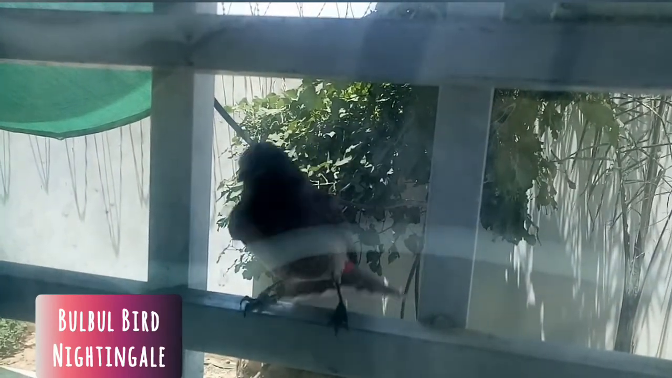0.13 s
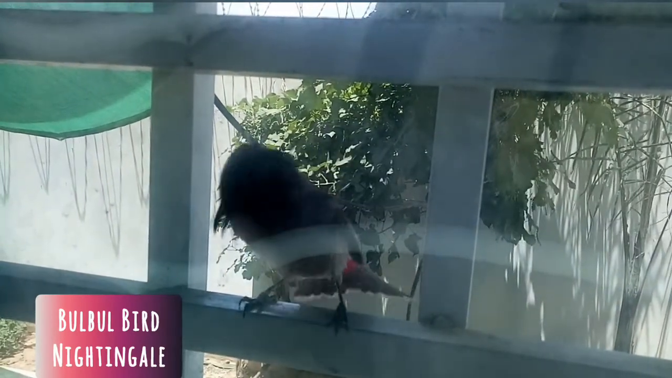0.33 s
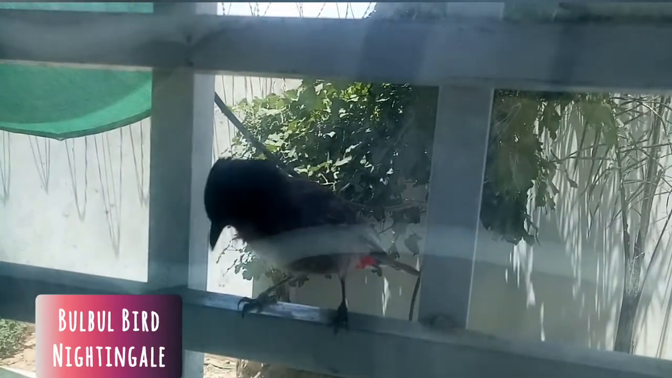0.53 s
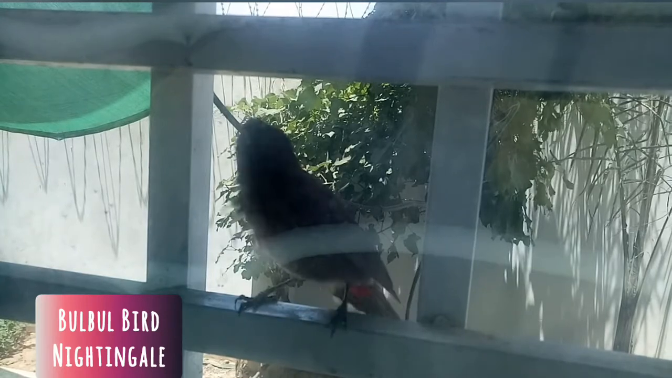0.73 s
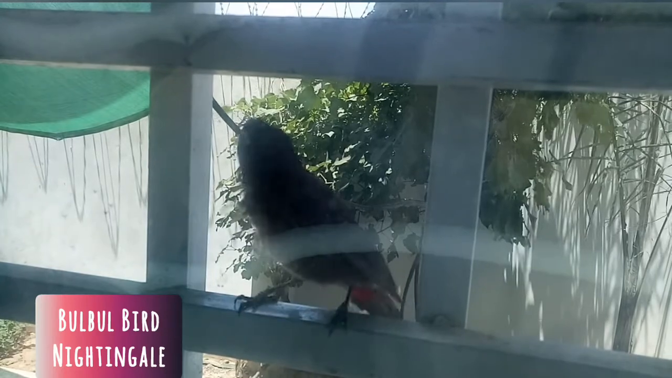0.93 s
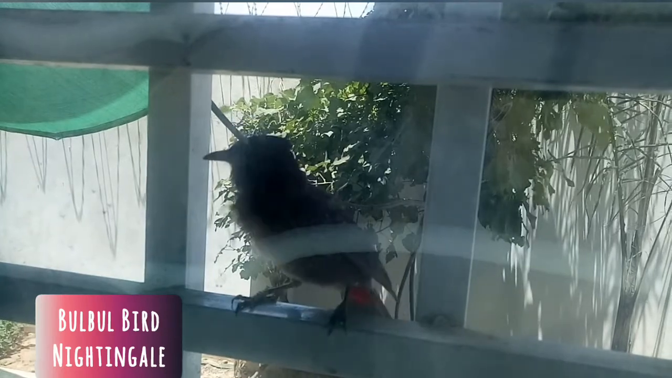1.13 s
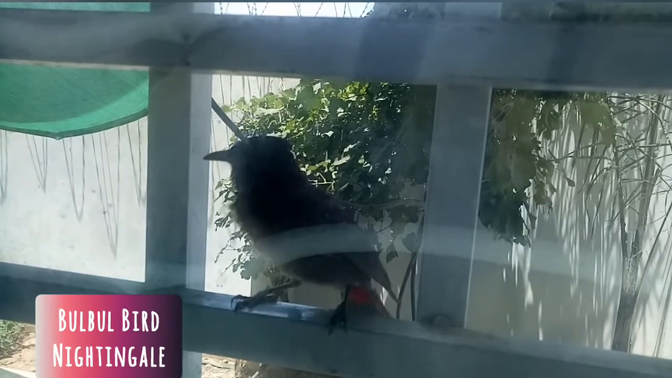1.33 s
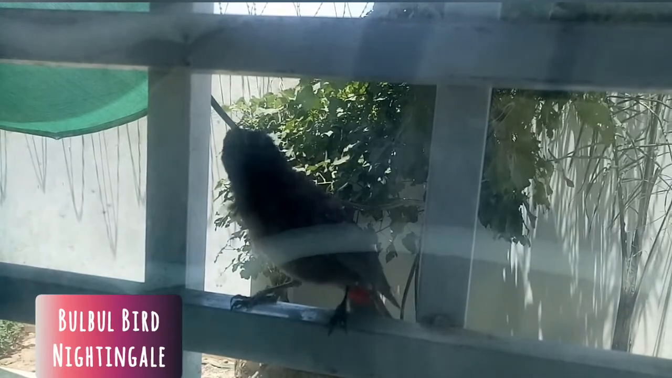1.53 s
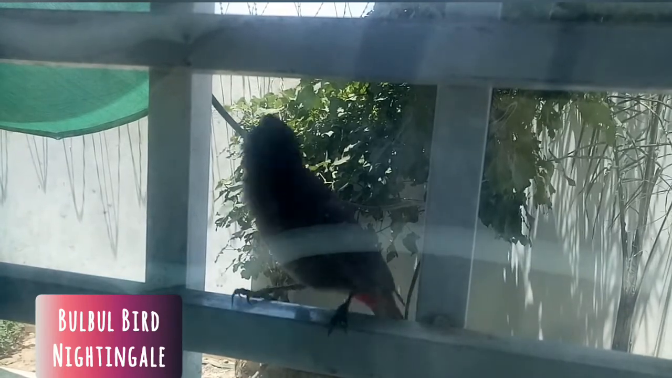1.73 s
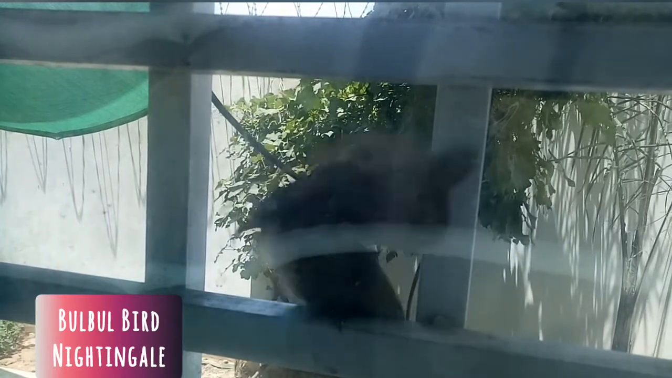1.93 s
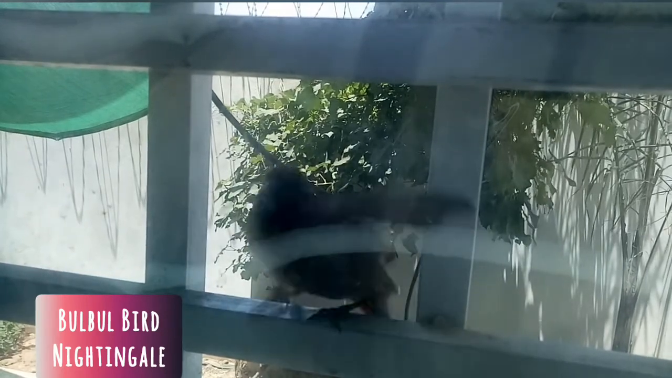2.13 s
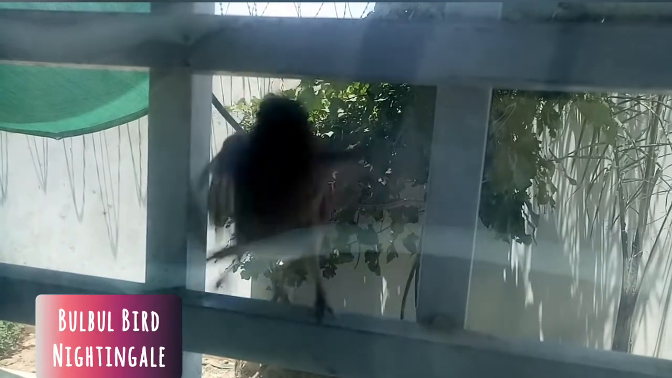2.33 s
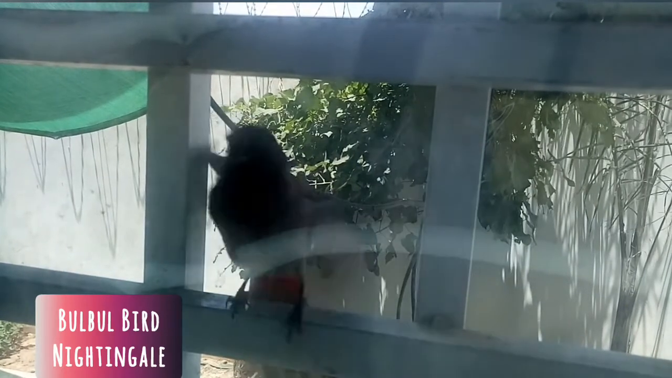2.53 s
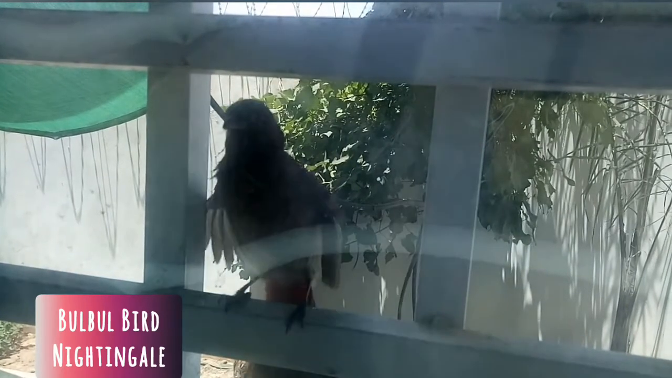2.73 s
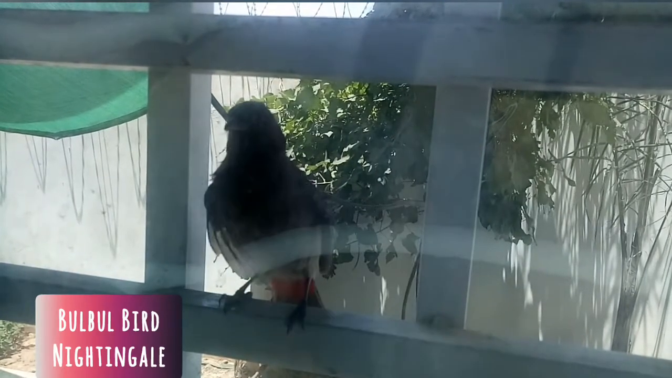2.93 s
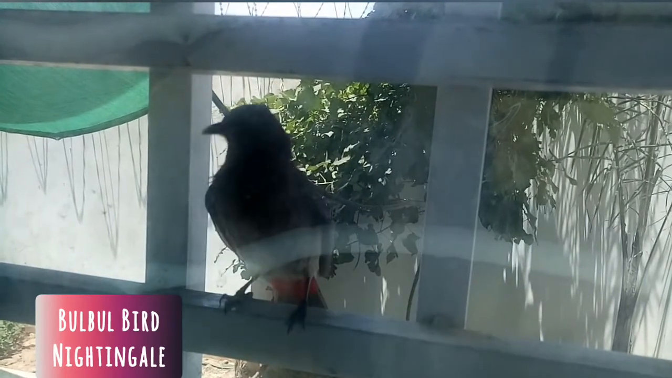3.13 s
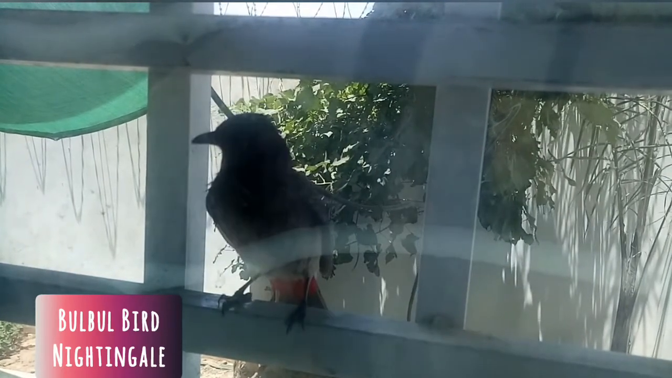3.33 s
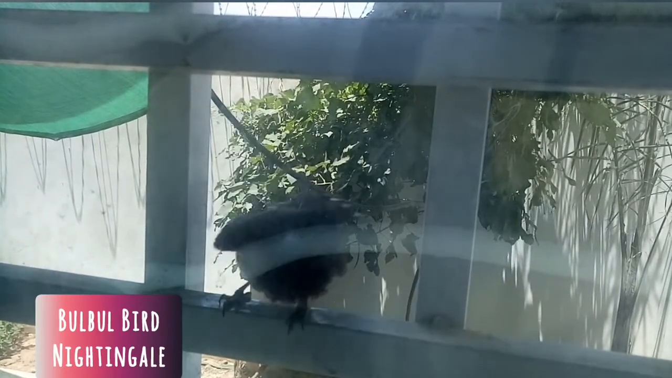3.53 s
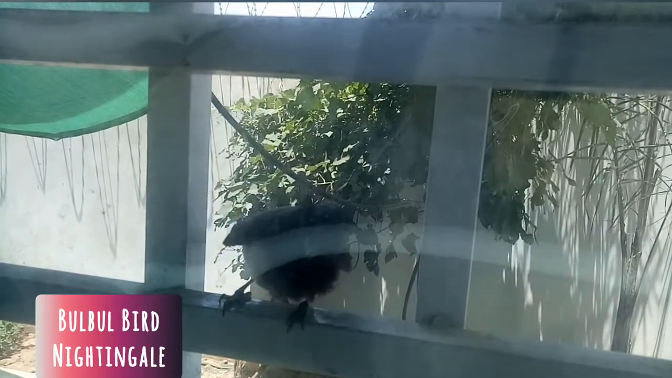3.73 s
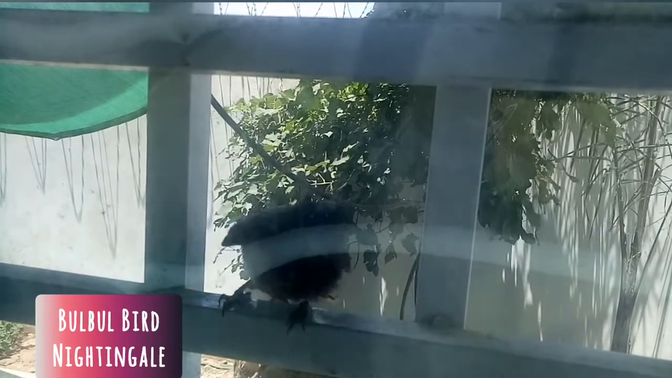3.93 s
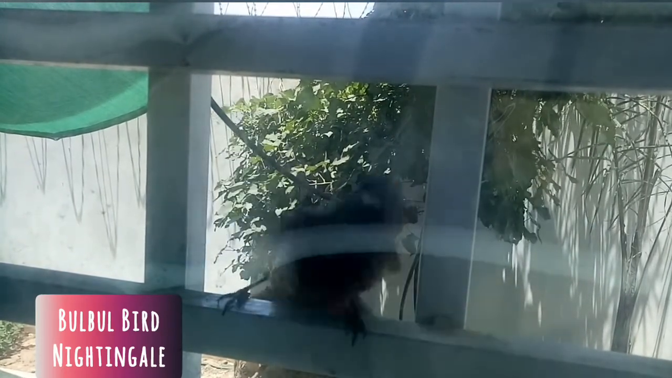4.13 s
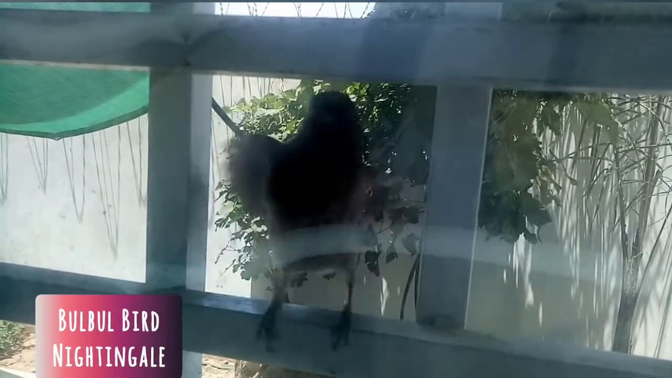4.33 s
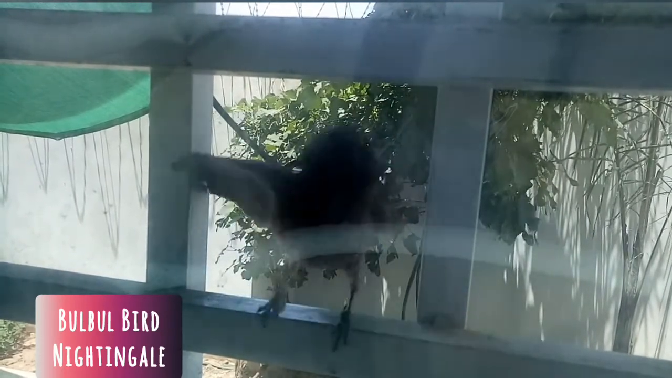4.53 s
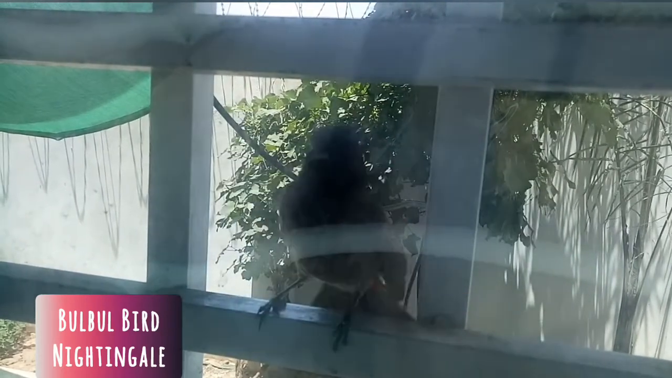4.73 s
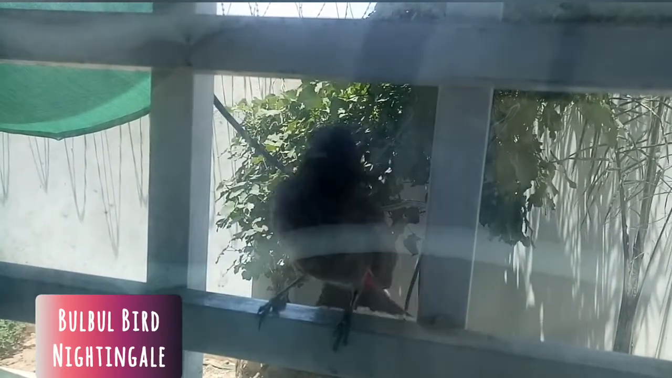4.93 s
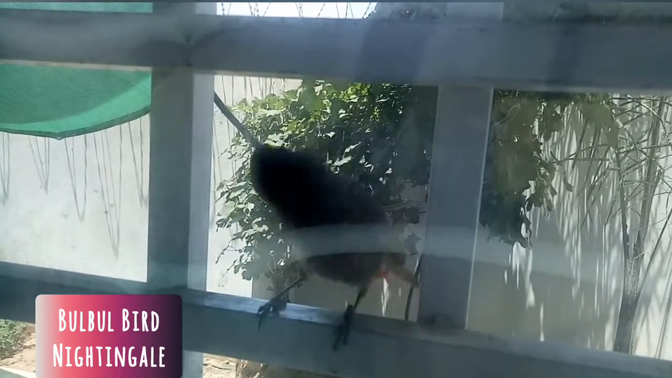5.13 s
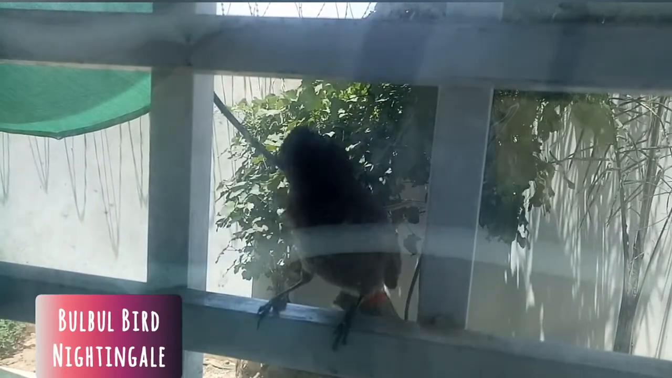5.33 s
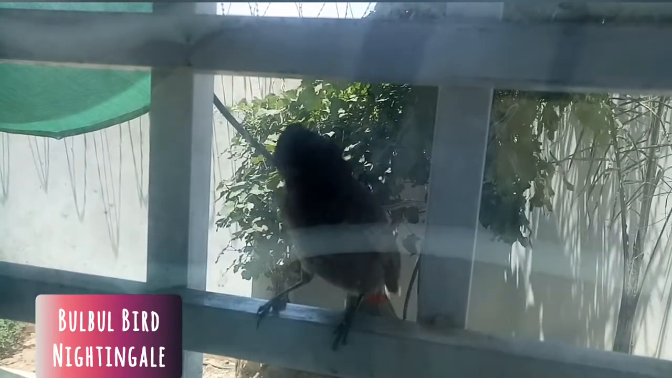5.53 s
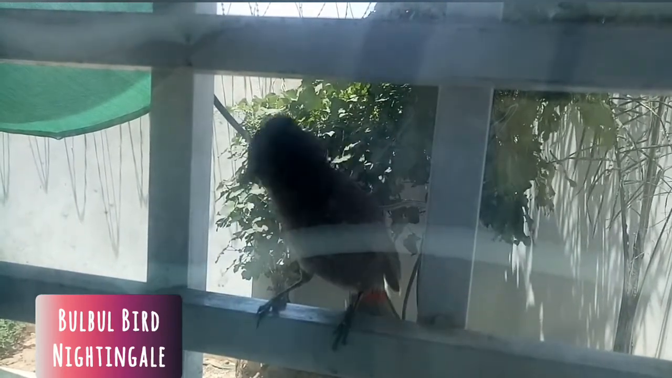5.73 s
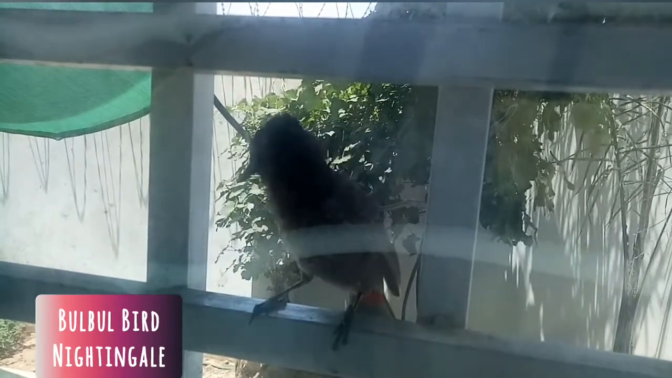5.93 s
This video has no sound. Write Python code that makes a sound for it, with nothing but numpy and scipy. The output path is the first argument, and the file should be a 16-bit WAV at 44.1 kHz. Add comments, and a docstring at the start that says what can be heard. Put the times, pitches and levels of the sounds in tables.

```python
"""Inside a small, bare room, a bird is heard pecking and fluttering at the window pane.
Each blow of the beak gives a thud and a bright clack of glass, and the room rings on.
A claw or feather skids on the glass, and the bird gives one tiny call. Other birds chirp faintly
outside, over a soft hiss and a low, wavering hum like that of a distant engine."""
import sys
import numpy as np
from scipy import signal
from scipy.fft import rfft, irfft
from scipy.io import wavfile
from scipy.ndimage import uniform_filter1d

SR = 44100
rng = np.random.default_rng(int(sys.argv[2]) if len(sys.argv) > 2 else 0)


def pcm_store(signal):
    """Save signal as 16-bit PCM."""
    levels = np.round(np.clip(np.atleast_2d(signal), -1, 1) * 32767)
    wavfile.write(sys.argv[1], SR, levels.astype(np.int16).T)


N = 268172
TIME = np.arange(N) / SR


def peck(level_db, thud_db, bright_db, clack_s, ring_db, push_s=0.00011, flex_hz=235, flex_s=0.0014):
    """One blow of the beak: a sharp push flexes the whole pane, and the glass clacks and rings."""
    # the tones the pane rings with: pitch_hz, level_db, fade_s (time to fall by 60 dB)
    pane_tones = [(106, -21, .25), (157, -21, .07), (268, -17, .12), (345, -17, .08), (499, -24, .07),
                  (600, -14, .055), (764, -27, .04), (1030, -19, .04), (1272, -20, .04), (1492, -16, .04),
                  (1640, -20, .04), (1840, -12, .045), (2326, -12, .055), (2658, -18, .04),
                  (2944, -17, .03), (3300, -16, .025), (3432, -11, .03), (3760, -11, .03), (4100, -12, .03),
                  (4445, -9, .03), (4654, -15, .04), (4922, -11, .03), (5826, -17, .015), (6660, -27, .02)]
    # tone colour of the waves that criss-cross the glass: pitch_hz, level_db
    clack_colour = [(200, -12.5), (700, -4.5), (1400, -3.5), (2000, 1.5), (2700, -3.5), (3500, 3.5),
                    (4950, 1), (5400, -8), (6500, -14), (7100, -21), (7500, -34.5), (8600, -38),
                    (13500, -47.5), (16000, -67.5)]
    t = np.arange(16384) / SR
    push = -amp(-13) * t / push_s * np.exp(1 - t / push_s)
    push = colour(push, [(2500, 0.5), (5000, -2.5), (8000, -36.0), (16000, -44.5)])
    flex = -amp(-19) * np.sin(2 * np.pi * flex_hz * t) * np.exp(-t / flex_s)
    hz, db, fade_s = np.transpose(pane_tones)[:, :, None]
    is_low = hz < 700
    # only a head-on blow moves the low tones; the high ones start anywhere in their swing
    db = db + np.where(is_low, thud_db, ring_db + bright_db * np.log2(hz / 3000))
    db = db + np.where(is_low, 0, rng.uniform(-3.5, 2.2, hz.shape))  # each spot favours other tones
    phase = np.where(is_low, np.pi, 2 * np.pi * rng.random(hz.shape))
    ring = (amp(db - 60 * t / fade_s) * np.sin(2 * np.pi * hz * t + phase)).sum(0)
    ring *= np.minimum(t / 0.0016, 1)
    clack = colour(bending_waves(t, clack_s), clack_colour, bright_db)
    return amp(level_db) * (amp(thud_db) * (push + flex) + amp(-18) * ring + amp(6) * clack)


def bending_waves(t, touch_s, fade_s=0.0044):
    """A crowd of ripples in the glass that holds while the beak touches and then fades."""
    shape = np.exp(-np.maximum(t - touch_s, 0) / fade_s)
    waves = rng.standard_normal(len(t)) * shape
    for _ in range(6):  # make all pitches about equally strong, keeping the fade
        even_spectrum = np.exp(1j * np.angle(rfft(waves)))
        waves = irfft(even_spectrum, len(t)) * shape
    return waves / np.linalg.norm(waves)


def skid(length_s, level_db):
    """A claw or feather skids on the glass with a thin, high squeak."""
    # tone colour of the squeak: pitch_hz, level_db
    skid_colour = [(500, -40), (4000, -3), (7300, -1), (8500, -15), (11000, -12), (13600, -5), (15000, -14)]
    count = int(length_s * SR)
    grains = rng.standard_normal(count) * amp(1.5 * wander(count, 200))
    return amp(level_db) * unit(colour(grains, skid_colour)) * np.hanning(count)


def chirp(length_s, first_hz, last_hz, level_db, roughness):
    """A bird's gliding whistle, made raspy by a fast flutter of its pitch."""
    count = int(length_s * SR)
    rasp = 1 + 0.14 * roughness * wander(count, rate_hz=420)
    hz = np.geomspace(first_hz, last_hz, count) * rasp
    whistle = np.sin(2 * np.pi * np.cumsum(hz) / SR)
    return amp(level_db) * unit(whistle * signal.windows.tukey(count, .8))


def peep(length_s, pitch_hz, level_db, roughness):
    """A smaller bird's thin whistle around one pitch."""
    return chirp(length_s, pitch_hz, pitch_hz, level_db, roughness)


def birds_outside():
    """Far birds sing and peep, heard almost wholly through their echoes."""
    # raspy song notes: start_s, length_s, first_hz, last_hz, level_db, roughness (0 to 1)
    song_notes = [(.415, 0.084, 3900, 3410, -67.5, 0.54), (.492, 0.026, 3440, 3200, -53, 0.35),
                  (.515, 0.028, 2770, 2210, -63, 0.54), (.415, 0.05, 2380, 2290, -69.5, 0.2),
                  (.555, 0.059, 2050, 1942, -64, 0.17), (.93, .09, 3200, 3744, -61, 0.38),
                  (.93, 0.12, 4430, 5080, -66, 0.7), (.995, .02, 4213, 3770, -46, .25),
                  (1.02, 0.05, 3720, 3410, -56.5, 0.3), (1.015, .12, 2430, 2183, -57, 0.19),
                  (1.32, .09, 2220, 2040, -59.5, 0.5), (1.33, .073, 3610, 3985, -55.5, 0.55),
                  (1.385, 0.0464, 3637, 3230, -52, 0.34), (1.42, 0.062, 3240, 2358, -51.5, 0.62),
                  (1.48, 0.032, 2288, 2108, -43.5, 0.04), (1.55, .068, 3545, 3640, -61, 0.4),
                  (3.575, 0.029, 3370, 3260, -62, 0.24), (3.645, 0.056, 4015, 3445, -64.5, .53)]
    # peeps of smaller birds: start_s, length_s, pitch_hz, level_db, roughness (0 to 1)
    peeps = [(.18, 0.045, 3900, -68.5, 0.3), (.22, 0.3, 4540, -74.5, 0.19), (1.77, 0.22, 4590, -75, .15),
             (2.04, 0.043, 4040, -69.5, 0.22), (3.11, .11, 4970, -73, 0.12),
             (3.19, 0.086, 4590, -65.5, 0.38), (3.33, 0.17, 4670, -68, 0.46),
             (3.45, 0.17, 4630, -71.5, 0.11), (5.2, 0.11, 4385, -75.5, 0.14),
             (5.99, 0.094, 4440, -69, 0.26)]
    song = play(song_notes, chirp) + play(peeps, peep)
    return room(song, direct_db=-9, tail_db=14, build_s=.005)


def twitter(level_db=-85):
    """Many far birds merge into a thin, drifting shimmer, mostly on the right."""
    # tone colour of the shimmer: pitch_hz, level_db
    shimmer_colour = [(20, -71.5), (3300, -33.5), (4000, -0.5), (4350, -6), (4600, -2), (4900, -16),
                      (5350, -9), (5700, -27), (16000, -81)]
    return stereo_noise(shimmer_colour) * amp(level_db + 2 * wander(N, 3.5)) * amp([[-10], [0]])


def hum(upper_hz=130.4, lower_hz=109.8, steps_per_s=50):
    """Two low tones creep up in pitch over a rumble; it all flutters in small steps that tick softly."""
    # the strength that both tones follow: time_s, level_db
    hum_strength = [(0.0, -63), (0.1, -47.5), (0.22, -60), (0.44, -48.5), (1.04, -53.5), (1.16, -46.5),
                    (1.78, -52.5), (1.88, -72), (2.0, -54.0), (2.22, -50), (2.56, -75), (3.06, -57.5),
                    (3.12, -81.5), (3.5, -47.5), (3.64, -46), (3.72, -53), (3.86, -49), (4.24, -60.5),
                    (4.3, -49.5), (5.34, -69), (5.38, -79.5), (5.78, -63), (5.84, -72.5), (6.08, -57)]
    strength_db = curve(hum_strength)
    swing_db = strength_db + 45  # how far the hum is from being loud
    upper = hum_tone(upper_hz + 4.9 * TIME, strength_db - 1, waver_hz=2.2, waver_db=3, rate_hz=8.3)
    lower = hum_tone(lower_hz + 2.1 * TIME, -57 + .6 * swing_db, waver_hz=3, waver_db=4, rate_hz=12)
    drone = upper + lower + rumble(swing_db)
    step = (TIME * steps_per_s).astype(int)
    flutter_db = 2 * rng.uniform(-1, 1, step[-1] + 1)
    flutter = uniform_filter1d(amp(flutter_db[step]), size=14)
    left, right = drone * flutter + ticks(strength_db - 3, step)
    return np.array([amp(1.8) * np.roll(left, 14), amp(-1.8) * right])  # left is louder and later


def hum_tone(hz, db, waver_hz, waver_db, rate_hz):
    """A low tone whose pitch and level waver; rate_hz sets how fast the level does."""
    turns = np.cumsum(hz + waver_hz * wander(N, 11)) / SR
    return np.sqrt(2) * amp(db + waver_db * wander(N, rate_hz)) * np.sin(2 * np.pi * turns)


def rumble(hum_swing_db, follow_share=0.2):
    """Deep, unsteady noise that takes on a small share of the hum's swings."""
    # slow rise and fall of the rumble: time_s, level_db
    rumble_level = [(0.0, -63.5), (0.46, -66.5), (2.94, -68.5), (3.26, -75.5), (3.64, -62.5), (4.64, -62),
                    (4.84, -68), (6.08, -71.5)]
    # tone colour of the rumble: pitch_hz, level_db
    rumble_colour = [(20, -10), (45, -11.5), (72, 6), (100, -2), (185, 5), (240, -4), (330, -1), (430, -16),
                     (650, -29), (1500, -42.5), (4000, -58.5)]
    level_db = 4 + curve(rumble_level) + follow_share * hum_swing_db
    return stereo_noise(rumble_colour) * amp(level_db + 3.5 * wander(N, 8))


def ticks(level_db, step, rise_s=.00022):
    """A soft, dull tick of random size at the start of each step."""
    clicks = np.diff(step, prepend=0) * rng.uniform(-0.17, 1, N) * amp(level_db)
    age = np.arange(200) / SR / rise_s
    return signal.fftconvolve(clicks, age * np.exp(1 - age))[:N]


def hiss(level_db=-69):
    """A soft, steady noise behind everything, strongest in the bass."""
    # tone colour of the hiss: pitch_hz, level_db
    hiss_colour = [(20, 10), (100, 18), (400, 6), (800, -1), (1500, -5), (3000, -6.5), (4500, -12),
                   (6000, -17.5), (8500, -20), (14000, -20.5), (16000, -21.5)]
    return amp(level_db) * stereo_noise(hiss_colour)


def room(sound, direct_db, tail_db, build_s=0.0076):
    """Bare walls add a few echoes and a fading tail; the left side is shaded and hears later."""
    # how long the room rings: pitch_hz, fade_s (time to fall by 60 dB)
    fade_times = [(100, 0.35), (300, 0.64), (600, 0.36), (1500, 0.48), (2500, 0.47), (4500, 0.58),
                  (7000, 0.14), (10000, .15)]
    # tone colour of the tail: pitch_hz, level_db
    tail_colour = [(80, -0.5), (300, 1), (600, -8), (1200, -7), (2200, -5.5), (4500, -6), (7000, 1),
                   (10000, 3)]
    # echoes from nearby walls: delay_s, level_db
    wall_echoes = [(.0068, -14.5), (0.0092, -15), (0.0167, -20.5), (.0232, -21), (0.045, -24.5)]
    # the shaded left side compared with the right: pitch_hz, level_db
    left_shade = [(100, 1.5), (300, -1), (600, -1.5), (1200, -12.5), (1950, -14.5), (2600, -23.5),
                  (3200, -26.5), (5000, -33.5), (7000, -21), (10000, -9)]
    # echoes that reach the left from other directions: pitch_hz, level_db
    stray_colour = [(100, -12), (1000, -5.5), (2200, -10), (3300, -26), (6000, -30)]
    hz, t, noise = signal.stft(rng.standard_normal((2, SR)), SR, nperseg=256)
    noise *= amp(at_pitch(tail_colour, hz)[:, None] - 60 * t / at_pitch(fade_times, hz)[:, None])
    tails = signal.istft(noise, SR, nperseg=256)[1]
    build_up = 1 - np.exp(-np.arange(tails.shape[1]) / SR / build_s)
    tails *= amp(tail_db) / np.sqrt(SR) * build_up
    for delay_s, level_db in wall_echoes:
        tails[0, round(delay_s * SR)] += amp(level_db)
    tails[0, 0] += amp(direct_db)
    right, stray = signal.fftconvolve(sound[None], tails, axes=1)[:, :N]
    left = colour(right, left_shade) + colour(stray, stray_colour)
    return np.array([np.pad(left, (9, 0))[:N], right])


def stereo_noise(points):
    """Noise of a given tone colour; left and right are alike in the bass and differ in the treble."""
    # how alike the two sides are: pitch_hz, likeness (0 to 1)
    side_likeness = [(25, .8), (70, 0.87), (600, 0.4), (1500, 0.32), (4000, 0.13), (9000, 0.094)]
    hz = np.fft.rfftfreq(N, 1 / SR)
    left, other = rfft(rng.standard_normal((2, N)))
    likeness = at_pitch(side_likeness, hz)
    right = likeness * left + np.sqrt(1 - likeness ** 2) * other
    return unit(irfft(np.array([left, right]) * amp(at_pitch(points, hz)), N))


def colour(sound, points, tilt_db=0, size=4096):
    """Filters a sound by (pitch_hz, level_db) points, brightened by tilt_db for each octave."""
    hz = abs(np.fft.fftfreq(size, 1 / SR))
    octaves = np.log2(np.clip(hz, 700, 7000) / 3000)
    log_gain = np.log(amp(at_pitch(points, hz) + tilt_db * octaves))
    response = np.exp(np.conj(signal.hilbert(log_gain)))  # nothing rings before the sound starts
    taps = np.fft.ifft(response).real[:size // 2]
    return signal.fftconvolve(sound, taps)[:len(sound)]


def low_cut(sound, cut_hz):
    """Takes away the deep bass."""
    return signal.sosfilt(signal.butter(3, cut_hz, "highpass", fs=SR, output="sos"), sound)


def wander(count, rate_hz):
    """A smooth random wobble, about one in size, that changes up to the given rate."""
    hz = np.fft.rfftfreq(count, 1 / SR)
    return unit(irfft(rfft(rng.standard_normal(count)) / (1 + (hz / rate_hz) ** 4), count))


def play(rows, voice):
    """Makes one sound for each row of a table and mixes it in at the row's start time."""
    mix = np.zeros(N)
    for start_s, *settings in rows:
        sound = voice(*settings)
        part = mix[round(start_s * SR):][:len(sound)]
        part += sound[:len(part)]
    return mix


def curve(points):
    """Joins (time_s, value) points with straight lines."""
    return np.interp(TIME, *np.transpose(points))


def at_pitch(points, hz):
    """Reads between (pitch_hz, value) points, with octaves evenly spaced."""
    point_hz, value = np.transpose(points)
    return np.interp(np.log(hz + 1), np.log(point_hz + 1), value)


def amp(db):
    """Turns decibels into a factor to multiply by."""
    return 10 ** (np.asarray(db) / 20)


def unit(sound):
    """Scales a sound to an average strength (rms) of one."""
    return sound / np.sqrt(np.mean(sound ** 2) + 1e-20)


def scene():
    """Pecks, skids and a call close by, then the birds outside, the hum and the hiss."""
    # blows on the pane: start_s, level_db, thud_db, bright_db (per octave), clack_s, ring_db
    blows = [(2.2650, 1, -1.5, 2, 0.0029, 0), (2.2839, -14, 6.5, -6.5, 0.0071, 10),
             (2.3365, -21, -8, 5.5, 0.0093, -5), (2.3815, -26, -28, 6, 0.0077, -1),
             (2.4100, -11.5, -6.5, -1.5, 0.0088, 3), (2.6250, -1, 1, -1.5, 0.0062, 4.5),
             (3.5608, -36, -14, -5.5, .008, 13), (4.0530, -46, -15, -.8, .016, 17),
             (4.2476, -5, -2.5, 2.5, 0.0047, -3.5), (4.2622, -25.5, -10, -11.5, 0.007, 5.5),
             (4.3730, -36.5, -11.5, 12.5, 0.014, -13), (4.4420, -39.5, -21, 2.5, 0.014, 10.5)]
    # the pecking bird's call: start_s, length_s, first_hz, last_hz, level_db, roughness (0 to 1)
    call_notes = [(4.487, 0.0173, 5970, 4520, -55, 0.31), (4.491, 0.016, 5430, 5380, -51.5, 0)]
    # skids on the glass: start_s, length_s, level_db
    skids = [(2.35, 0.075, -72), (2.39, .05, -68), (4.36, 0.075, -75)]
    at_window = low_cut(play(blows, peck), cut_hz=127) + play(call_notes, chirp)
    squeaks = play(skids, skid) * amp([[-9], [0]])  # mostly on the right
    far = birds_outside()
    near = room(at_window, direct_db=0.5, tail_db=11)
    return near + squeaks + far + twitter() + hum() + hiss()


def record(dry, top_hz=15400):
    """Takes away the very highest treble."""
    taps = signal.firwin(511, top_hz, window=("kaiser", 9), fs=SR)
    return signal.oaconvolve(dry, taps[None], "same")


dry = scene()
out = record(dry)
pcm_store(out)
```